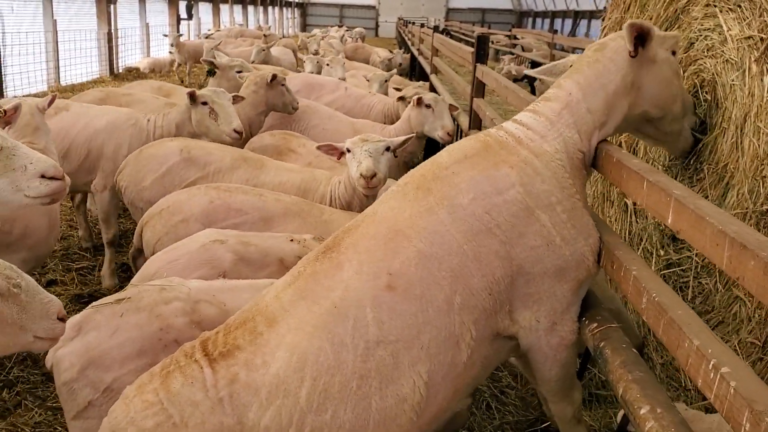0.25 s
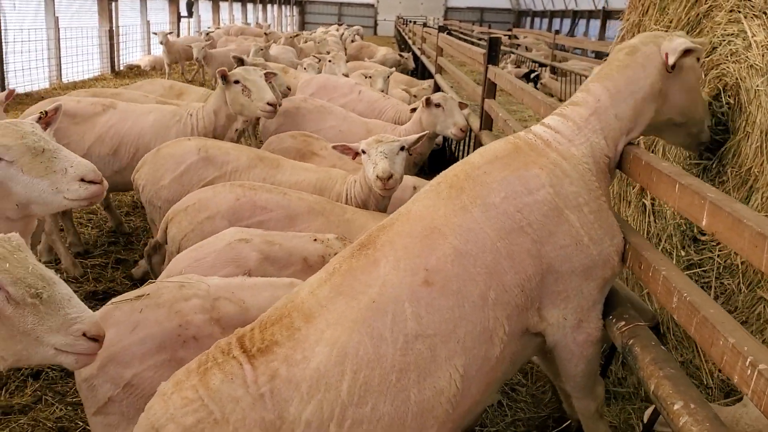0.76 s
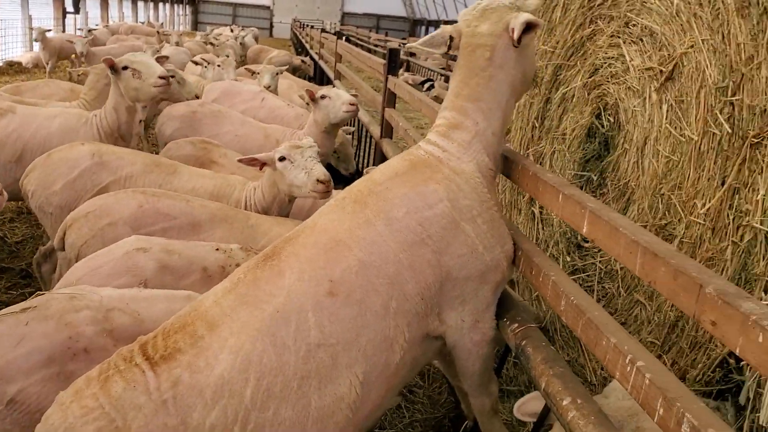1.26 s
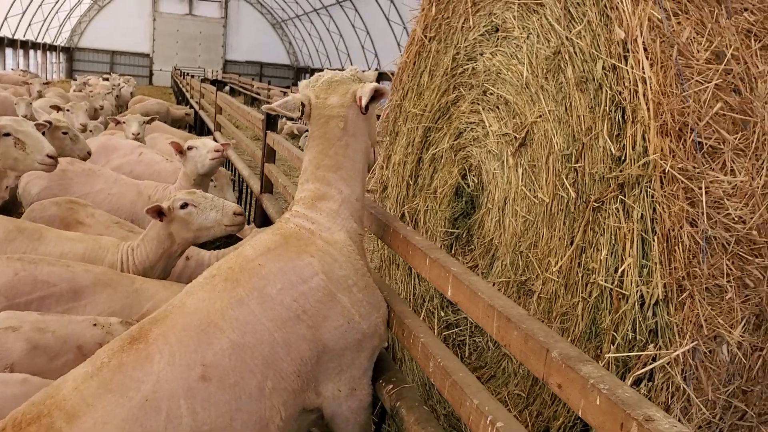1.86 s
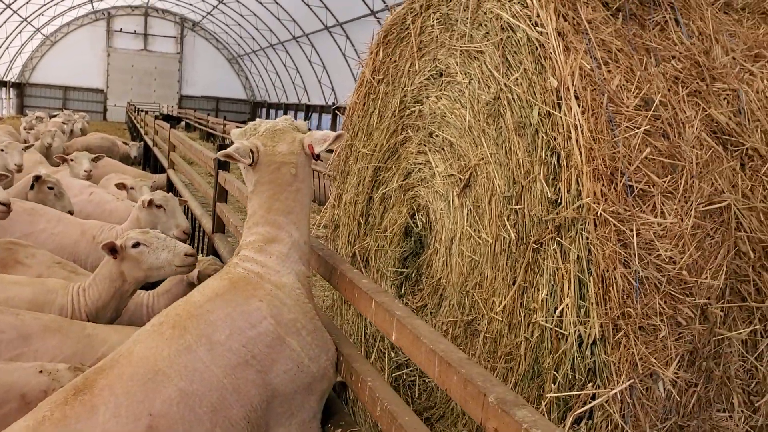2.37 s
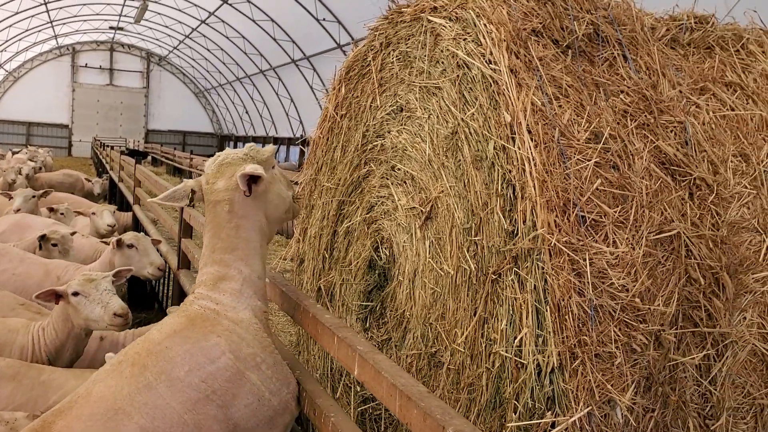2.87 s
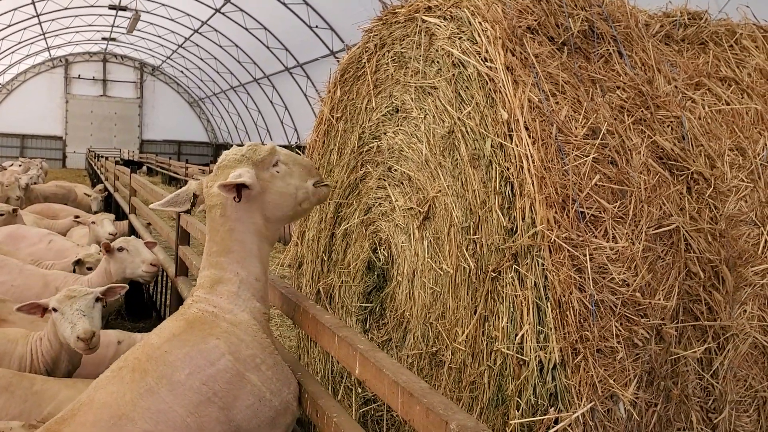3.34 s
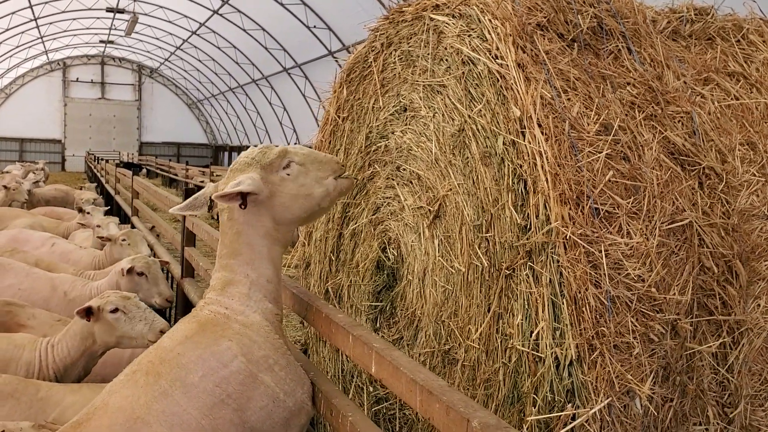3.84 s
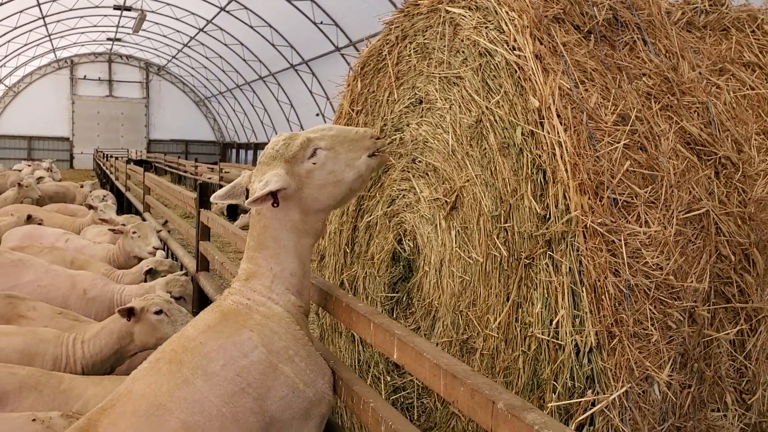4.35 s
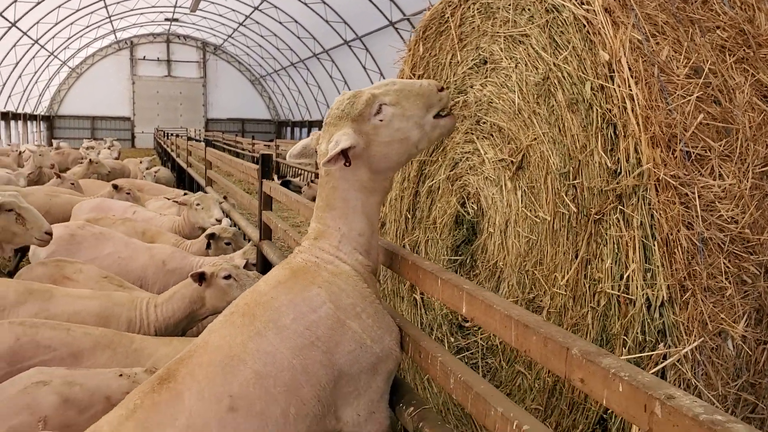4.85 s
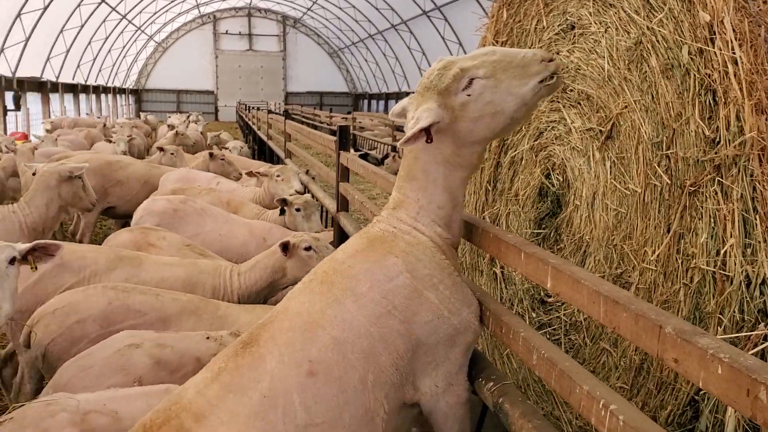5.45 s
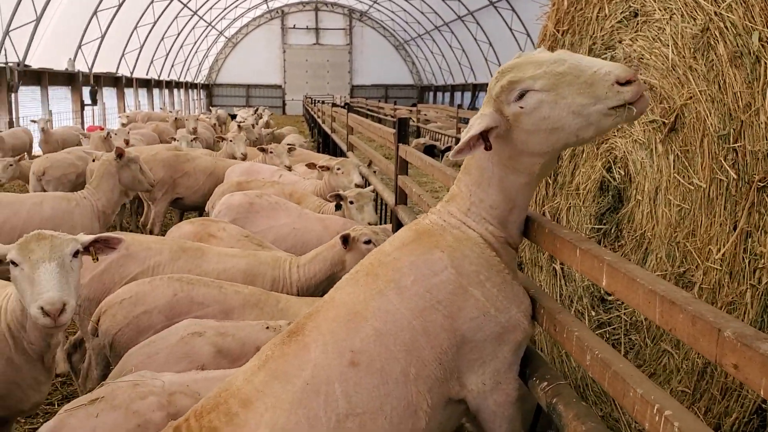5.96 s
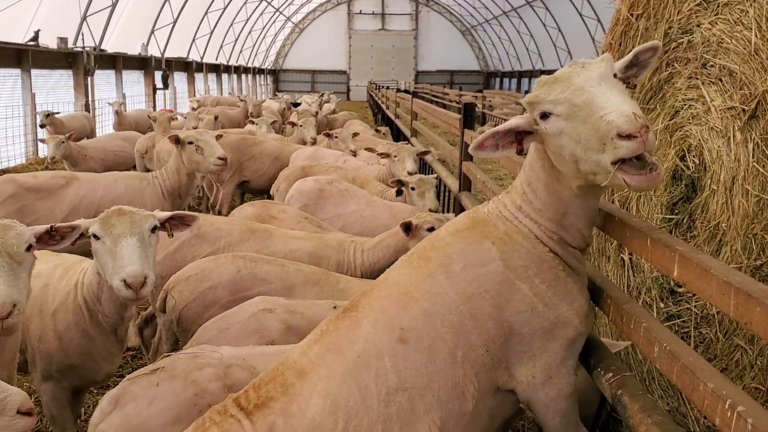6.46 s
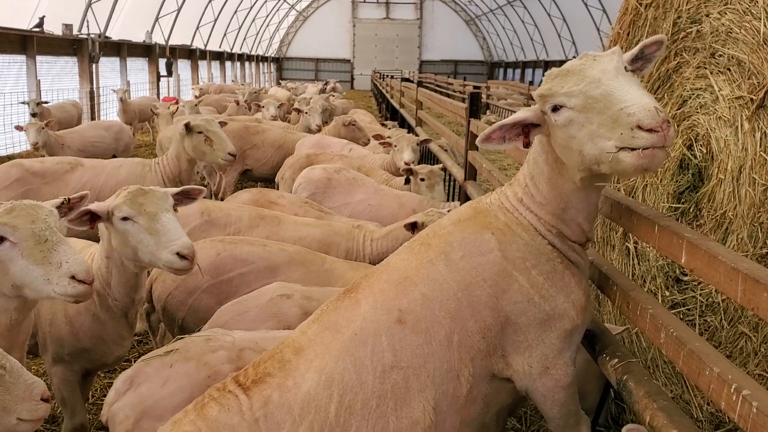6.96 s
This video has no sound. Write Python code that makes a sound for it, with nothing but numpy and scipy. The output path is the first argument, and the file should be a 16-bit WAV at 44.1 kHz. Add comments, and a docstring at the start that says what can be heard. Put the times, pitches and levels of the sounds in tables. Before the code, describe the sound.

A flock shuffles through straw inside a barn for about seven seconds, a soft, crisp rustle over a low rumble of feet, heard in stereo from among the animals. Right at the start, a sheep some way off gives a rough, quavering bleat that throbs seven times and ends around 0.9 seconds. Soft hooves thud, and dry stalks snap at about 1.1 and 1.9 seconds. At 2.3 seconds an animal scuffs briefly close by. At 3.2 seconds a nearer sheep opens with a rasp, glides up to a clear, level note and holds it, dropping away at about 4.3 seconds. Both calls sit slightly left, stand well above the rustle and leave a short echo. Small birds chirp very faintly overhead now and then. Another stalk cracks near 4.9 seconds, and from 5.6 seconds a run of hoof knocks and thuds carries on to the end.

```python
"""Inside an arched sheep barn, on a stereo microphone held among the flock. Straw rustles and hooves thud from
the start. Some way off, a sheep bleats, its larynx throbbing seven times. Stalks snap, a board is knocked,
small birds chirp faintly under the roof, and at 2.3 s an animal scuffs past close by. At 3.2 s a nearer sheep
opens with a rasp, then its vocal folds lock onto a clear held note. Pen boards and roof return both calls, and
the flock shuffles on to the end."""
import sys
import numpy as np
from scipy import signal
from scipy.fft import rfft, irfft, next_fast_len
from scipy.io import wavfile
from scipy.ndimage import uniform_filter1d, map_coordinates

SR = 44100
rng = np.random.default_rng(int(sys.argv[2]) if len(sys.argv) > 2 else 0)


def wav_out(sig):
    """Save sig, one row per channel (or a flat mono array), as 16-bit PCM at SR to the path in sys.argv[1]."""
    wavfile.write(sys.argv[1], SR, np.round(np.clip(np.atleast_2d(sig).T, -1, 1) * 32767).astype(np.int16))


N = 317961
TIME = np.arange(N) / SR

# far sheep, throbs of the larynx: centre_s, level_db, pitch_hz
THROBS = [(0.21, -23, 187.3), (0.304, -20.5, 187.7), (0.403, -20, 182.4), (0.495, -21.5, 180),
          (0.589, -23.5, 182.8), (.685, -25, 175.9), (0.771, -24.5, 181.9)]
# far sheep, mouth closed: frequency_hz, gain_db
HUM_VOWEL = [(71, -34.5), (120, 26), (189, 8.5), (528, -0.5), (1050, -2.5), (1340, -12), (1540, -1.5),
             (2170, -5.5), (2460, 0.5), (2790, -37), (3500, -16), (4550, -54), (7700, -120)]
# mouth half open: frequency_hz, gain_db
MEH_VOWEL = [(110, -57), (180, -7.5), (410, -17.5), (555, 2), (690, -9), (770, -17), (900, -14.5),
             (1250, -16.5), (1560, 0.5), (1750, -12.5), (1950, 5.5), (2200, -13), (2550, -6.5),
             (2850, -21.5), (3700, -21.5), (6500, -45)]
# mouth fully open: frequency_hz, gain_db
BAA_VOWEL = [(110, -38), (180, -11), (410, -17), (535, -2), (670, -9), (770, -13), (900, -15), (1250, -9),
             (1500, -8.5), (1750, -11), (2130, 7.5), (2550, -4), (2900, -20), (3250, -12), (4150, -20),
             (5000, -48)]
# far sheep's balance at the microphone: frequency_hz, left_over_right_db
QUAVER_BALANCE = [(60, 0.5), (110, -1), (200, 0.5), (380, 1), (700, 6), (1290, 9), (2380, 8), (4400, 1),
                  (8120, 4), (15000, -25)]
# its phase at the microphone: frequency_hz, left_lead_rad
QUAVER_PHASE = [(200, 0.4), (800, -0.55), (1200, -2), (2100, -2.5), (2700, -1.4), (6000, -2.5)]

# near sheep, mouth opening: frequency_hz, gain_db
OPENING_VOWEL = [(71, -50), (120, -9), (281, -5), (461, -5), (633, 13.5), (696, 12), (1010, -10), (1240, 2),
                 (1400, 12.5), (1500, 9), (2010, 4.5), (2400, -6.5), (2910, 0), (3200, 9), (4160, -58),
                 (7040, -120)]
# mouth wide: harmonic_number, gain_db
WIDE_VOWEL = [(1, -17), (2, -14), (3, -9.5), (4, 0), (5, -15), (6, -24.5), (7, -4), (8, -1.5), (9, -22),
              (10, -12), (11, -18.5), (12, -30), (13, -27.5), (14, -18.5)]
# mouth settled on the note: harmonic_number, gain_db
SETTLED_VOWEL = [(1, -12.5), (2, -13.5), (3, 3), (4, 5), (5, -6.5), (6, -17.5), (7, 2), (8, 4), (9, -14),
                 (10, -3), (11, -15.5), (12, -28), (13, -14.5), (14, -20)]
# colour of the rasp: frequency_hz, gain_db
RASP_TONE = [(2300, -24), (2900, 9.5), (3500, 0.5), (3950, 6.5), (4450, -3.5), (5300, -0.5), (6600, -12),
             (8000, -7.5), (11000, -26)]
# course of the mouth resonance: time_s, level_db
MOUTH_RESONANCE = [(3.21, -42), (3.252, -28), (3.288, -20), (3.47, -21.5), (3.518, -31.5), (3.536, -25.5),
                   (3.64, -32), (3.798, -24.5), (4.022, -28), (4.074, -36), (4.19, -35), (4.214, -27),
                   (4.3, -43.5)]
# near sheep's balance at the microphone: frequency_hz, left_over_right_db
HELD_BALANCE = [(60, 8), (110, 5), (200, 0), (380, 1), (700, 4), (1290, 9.5), (2380, 7), (4400, -5),
                (8120, 9), (15000, -14)]
# its phase at the microphone: frequency_hz, left_lead_rad
HELD_PHASE = [(150, 0.073), (500, 0.99), (900, 0.46), (1300, 2.3), (1500, 0.25), (1900, 2.57), (3000, 1.6),
              (6000, 1.7)]

# scuffed bedding: frequency_hz, gain_db
SCUFF_TONE = [(53, -13), (90, -3), (177, 1.5), (240, -7), (389, -4.5), (463, -12), (572, -3.5), (655, -15),
              (909, -12), (1240, -17.5), (3000, -18.5), (9000, -29), (11700, -60), (19800, -120)]
# hooves on bedding and boards: start_s, strength_db, pitch_hz
HOOF_STEPS = [(.245, -29.5, 85), (0.716, -34, 75), (1.225, -35, 80.5), (1.276, -43, 185),
              (1.384, -36, 63.4), (1.62, -38.5, 69.6), (2.95, -32, 157), (3.1, -41, 235), (5.652, -36, 309),
              (6.004, -38, 247), (6.115, -31, 393), (6.392, -31.5, 308), (6.469, -29.5, 358),
              (6.871, -28.5, 104), (7.049, -34, 99), (7.175, -32.5, 86)]
# stalks snapping underfoot, and one knock on the boards at 4.89 s: start_s, level_db
SNAPS_AND_KNOCKS = [(1.116, -45.5), (1.896, -41), (4.699, -66), (4.891, -46.5)]
# crack of a stalk or knock on a board: frequency_hz, gain_db
SNAP_TONE = [(300, -10), (900, 0), (3000, -4), (6000, -2), (12000, -12)]
# how busily the flock moves: time_s, bustle_db
BUSTLE = [(0.0, -46), (0.68, -47.5), (1.61, -51), (2.11, -45), (2.59, -48), (2.85, -44), (3.65, -49.5),
          (4.44, -50), (4.9, -51), (5.78, -47), (6.49, -47), (7.21, -44)]
# legs sweeping through straw: centre_s, level_db, half_length_s
LEG_SWISHES = [(0.16, -43.5, 0.044), (0.372, -41.5, .05), (0.841, -41, .025), (1.327, -45, 0.049),
               (1.63, -45.5, 0.067), (2.269, -33, 0.015), (2.82, -42.5, .03), (4.36, -47.5, .05),
               (6.256, -43.5, 0.092), (6.402, -41.5, 0.049), (7.176, -42, .035)]
# crisp straw: frequency_hz, gain_db
STRAW_TONE = [(470, -46), (800, -15), (1050, -7.5), (1590, -8.5), (2010, -6), (2170, -7), (2580, -8.5),
              (3350, -5.5), (4690, -8), (5800, -4.5), (7250, -5.5), (8850, -12), (13200, -2), (15100, 2),
              (15700, -3)]
# dull shuffle of feet: frequency_hz, gain_db
SHUFFLE_TONE = [(110, -14), (175, 5), (290, 7), (500, 0.5), (800, -3), (1400, -21.5)]
# rumble of feet: frequency_hz, gain_db
RUMBLE_TONE = [(20, -40), (32, -16), (50, -1.5), (80, 1), (120, -4.5), (180, -11.5), (300, -32)]
# likeness of the floor noise in left and right: frequency_hz, correlation
FLOCK_LIKENESS = [(60, 0.97), (130, 0.96), (290, 0.95), (640, 0.6), (1410, -0.19), (3100, 0.054),
                  (6820, -0.033), (15000, 0.041)]
# its balance at the microphone: frequency_hz, left_over_right_db
FLOCK_BALANCE = [(60, 0.5), (110, 0.5), (200, 0), (380, 1.5), (700, 4), (1290, 8), (2380, 6), (4400, 1.5),
                 (8120, 5), (15000, 0.5)]
# small birds under the roof: centre_s, level_db, mid_pitch_hz
CHIRPS = [(1.53, -53.5, 3230), (1.689, -53, 3570), (2.45, -50.5, 3350), (3.185, -51, 3450),
          (3.81, -46, 3380), (5.735, -54, 3420), (6.95, -51, 3480)]
# the barn's decay: frequency_hz, t60_s
BARN_DECAY = [(150, 1), (600, 0.66), (2000, 0.76), (4000, 0.95), (10000, 0.4)]
# colour of its tail: frequency_hz, gain_db
BARN_TONE = [(200, -7), (700, 10.5), (1800, 5.5), (6000, 11.5)]


def quavering_bleat():
    """Far sheep: the mouth opens from a hum; each larynx throb lifts pitch, loudness and fullness."""
    scoop = bump(.165, .078)  # the pitch scoops up as the mouth opens
    pitch_hz = 158.35 + 35.02 * scoop
    rest_level = amp(-45.5 + 9 * ramp(0, .098) + 3.3 * scoop - 174 * since(.776))
    level, drive, throb_half_s = rest_level, np.zeros(N), .018
    for centre_s, level_db, throb_hz in THROBS:
        push = bump(centre_s, 1.7 * throb_half_s)
        pitch_hz = pitch_hz + (throb_hz - pitch_hz) * push
        level = level + np.maximum(amp(level_db) - rest_level, 0) * bump(centre_s, throb_half_s)
        drive = drive + push
    opened, gape = ramp(.12, .21), .62 * bump(.5, .23)
    rough = .23 + .22 * opened + .13 * ramp(.29, .63)  # the voice frays as the call goes on
    pulses = vocal_folds(pitch_hz, rough, jitter_s=.0002, shimmer_db=1.8, air=1.65)
    vowel = (1 - gape) * throat(pulses, MEH_VOWEL) + gape * throat(pulses, BAA_VOWEL)
    # between throbs the voice thins to its main mouth resonance
    core = filtered(vowel, lambda hz: np.exp(-((hz - 2000) / 700) ** 2))
    vowel = core + (vowel - core) * (.62 + .55 * drive)
    voice = steady((1 - opened) * throat(pulses, HUM_VOWEL) + opened * vowel)
    return at_microphone(voice * level, QUAVER_BALANCE, QUAVER_PHASE)


def held_bleat():
    """Near sheep: a rasp glides up through two vowels, then the folds lock into a clean, level note."""
    start_s, attack_s, rasp_s, lock_s, release_s = 3.222, .055, 3.35, .1, 4.22
    full_s = start_s + attack_s
    slack = ramp(release_s - .025, release_s + .08) ** 2  # the folds let go ever faster
    rough = .015 + .17 * np.exp(-since(rasp_s) / lock_s) + .65 * slack ** .8
    pulses = vocal_folds(held_pitch(slack), rough, jitter_s=.00022, shimmer_db=4, air=1.7)
    wide = throat(pulses, [(harmonic * 185, db) for harmonic, db in WIDE_VOWEL])
    settled = throat(pulses, [(harmonic * 183, db) for harmonic, db in SETTLED_VOWEL])
    widen, settle = ramp(3.3, 3.37), ramp(3.55, 3.91)
    voice = (1 - widen) * throat(pulses, OPENING_VOWEL) + (widen - settle) * wide + settle * settled
    below = lambda edge_hz, order: filtered(voice, lambda hz: 1 / (1 + (hz / edge_hz) ** order))
    low, low_and_mid, whole = below(1010, order=12), below(1690, order=24), below(2630, order=24)

    release_db_per_s = 143
    gate_db = -26 * until(full_s) / attack_s - release_db_per_s * since(release_s)
    throat_db = -22.5 + gate_db - 7.5 * since(full_s)  # breath slowly runs out
    mouth_db = curve(MOUTH_RESONANCE) - .3 - release_db_per_s * since(MOUTH_RESONANCE[-1][0])
    # the upper resonances flare in the attack, then stay as a steady twang
    twang = amp(.66 * gate_db) * np.hypot(amp(-27.5 - 66 * since(rasp_s)), amp(-39.5))
    rasp = amp(-34.5 - 155 * until(rasp_s) - 118 * since(rasp_s))
    buzz = settle * amp(throat_db - 23)
    call = (amp(throat_db) * steady(low)
            + amp(mouth_db) * steady(low_and_mid - low)
            + twang * steady(whole - low_and_mid)
            + (rasp + buzz) * throat(pulses, RASP_TONE))
    voiced = ramp(start_s, start_s + .01) - ramp(release_s + .085, release_s + .116)
    return at_microphone((call + rail_echo(call)) * voiced, HELD_BALANCE, HELD_PHASE)


def held_pitch(slack):
    """The folds tighten past the note, ease back onto it and slacken at the end."""
    from_hz, note_hz, overshoot_hz, drop_hz = 145.5, 182.7, 4.2, 36.1
    top_hz = note_hz + overshoot_hz * np.exp(-since(3.44) / .12)
    glide = np.sin(np.pi / 2 * ramp(3.24, 3.44))
    return (from_hz + (top_hz - from_hz) * glide - drop_hz * slack) * (1 + .0008 * wobble(25))


def vocal_folds(pitch_hz, rough, jitter_s, shimmer_db, air):
    """One pulse per cycle; roughness scales the scatter in time and level and each puff of air."""
    cycles = np.cumsum(pitch_hz) / SR
    closures = np.interp(np.arange(1, int(cycles[-1])), cycles, np.arange(N))
    puffs = rng.standard_normal(N) * np.exp(-3.5 * (cycles % 1))
    puffs = filtered(puffs, lambda hz: hz ** 2 / (hz ** 2 + 700 ** 2))  # turbulence spares the bass
    scatter = rng.standard_normal((len(closures), 2)) * rough[closures.astype(int), None]
    closures = closures + jitter_s * SR * scatter[:, 0]
    # a windowed sinc places each pulse between samples
    taps = closures.astype(int)[:, None] + np.arange(-7, 9)
    offset = taps - closures[:, None]
    shapes = np.sinc(offset) * np.cos(np.pi * offset / 16) ** 2 * amp(shimmer_db * scatter[:, 1:])
    pulses = np.bincount(np.clip(taps, 0, N - 1).ravel(), shapes.ravel(), N)
    return unit(pulses) + air * rough * unit(puffs)


def throat(pulses, vowel, size=4096):
    """Throat and mouth ring on after each pulse strikes; the level is held steady."""
    hz = np.fft.rfftfreq(size, 1 / SR)
    gain = amp(along(vowel, hz)) * hz ** 2 / (hz ** 2 + 90 ** 2)
    cepstrum = irfft(np.log(np.maximum(gain, 1e-4)))
    cepstrum[1:size // 2] *= 2  # folded to minimum phase
    cepstrum[size // 2 + 1:] = 0
    lag_s_per_hz = 5e-7  # the folds do not close all at once, so higher partials come later
    ring = irfft(np.exp(rfft(cepstrum) - 1j * np.pi * lag_s_per_hz * hz ** 2))
    return steady(signal.fftconvolve(pulses, ring)[:N])


def at_microphone(voice, balance, phase):
    """A voice reaches the microphone's two ports with different strength and phase."""
    def response(hz):
        left = amp(along(balance, hz) / 2) * np.exp(.5j * along(phase, hz))
        return np.array([left, 1 / left]) * 2 / np.abs(left + 1 / left)
    return filtered(voice, response)


def scuff(peak_s=2.281, hold_s=.045):
    """One animal brushes through the bedding, close to the microphone."""
    level_db = -32.5 - 172 * until(peak_s) - 168 * since(peak_s + hold_s)
    return amp(level_db) * rustle(SCUFF_TONE, patchy_db=2.5, grain_db=1.5)


def hooves():
    """Each step is a soft, quickly damped thud with a short crunch of straw."""
    thuds, crunch = np.zeros(N), np.zeros(N)
    for start_s, strength_db, pitch_hz in HOOF_STEPS:
        age_s = since(start_s)
        t60_s = .04 + 6 / pitch_hz  # deep thuds last longer
        blow = amp(strength_db - 60 * age_s / t60_s) * (1 - np.exp(-age_s / .0055))
        thuds += blow * np.sin(2 * np.pi * pitch_hz * age_s + 1.05 * wobble(170))
        crunch += blow
    return amp(2.5) * thuds + amp(-12.5) * crunch * rustle(SCUFF_TONE, patchy_db=-1, grain_db=3.5)


def snaps_and_knocks(t60_s=.15):
    """Dry stalks break, and a board is knocked once, each with a brief, broad crack."""
    bursts = sum(amp(db - 60 * since(s) / t60_s) * (TIME >= s) for s, db in SNAPS_AND_KNOCKS)
    return bursts * rustle(SNAP_TONE, patchy_db=3, grain_db=2)


def flock():
    """Feet in deep straw all round: a crisp rustle, a dull shuffle and a rumble grow with the bustle."""
    bustle_db = curve(BUSTLE)
    bustle_db -= bustle_db.mean()
    level = lambda db, growth, swing_db: amp(db + growth * bustle_db + swing_db * wobble(9))
    swishes = sum(amp(db) * bump(s, half_s) for s, db, half_s in LEG_SWISHES)
    straw_level = np.hypot(level(-44.5, growth=1.11, swing_db=1.15), swishes)
    straw = straw_level * rustle(STRAW_TONE, patchy_db=1.5, grain_db=1)
    shuffle = level(-53.5, growth=1.2, swing_db=1.2) * rustle(SHUFFLE_TONE, patchy_db=2.5, grain_db=1.5)
    rumble = level(-51, growth=1.9, swing_db=1.3) * rustle(RUMBLE_TONE, patchy_db=1.5, grain_db=1.5)
    return straw + shuffle + rumble


def rustle(tone, patchy_db, grain_db):
    """Trodden bedding: grainy stereo noise, its gain patchy in time and frequency, at mono rms 1."""
    grains = rng.standard_normal((2, N)) * amp(grain_db * wobble(350))
    spectra = signal.stft(grains, nperseg=512)[2]
    patches = uniform_filter1d(rng.standard_normal(spectra.shape[1:]), size=7, axis=0)
    patches = unit(uniform_filter1d(patches, size=10, axis=1))
    pair = signal.istft(spectra * amp(patchy_db * patches), nperseg=512)[1][:, :N]
    width = lambda hz: np.tan(np.arccos(np.clip(along(FLOCK_LIKENESS, hz), -.9, 1)) / 2)
    mid, side = filtered(pair, lambda hz: amp(along(tone, hz)) * [np.ones_like(hz), width(hz)])
    balance = lambda hz: amp(np.outer([.5, -.5], along(FLOCK_BALANCE, hz)))
    stereo = filtered(np.array([mid + side, mid - side]), balance)
    return stereo / np.std(stereo.mean(axis=0))


def birds():
    """Short, husky chirps from under the roof arch up and down in pitch."""
    song = np.zeros(N)
    for centre_s, level_db, mid_hz in CHIRPS:
        arch = bump(centre_s, .022)
        pitch_hz = mid_hz * (.92 + .16 * arch + .025 * wobble(400))
        song += amp(level_db) * arch * np.sin(2 * np.pi * np.cumsum(pitch_hz) / SR)
    return np.array([song, song])


def rail_echo(call):
    """As the head turns, a reflection off the rail slides in delay, so overtones swell and fade."""
    delay_s = .0026 + .00006 * wobble(3)
    return amp(-17) * map_coordinates(call, [np.arange(N) - delay_s * SR])


def pen_boards(sound, count=12):
    """Boards close by return a scatter of bright early copies, different at each port."""
    echoes = np.zeros((2, SR // 20))
    for port in echoes:
        port[rng.integers(SR // 700, SR // 50, count)] = rng.choice([-1, 1], count) / np.sqrt(count)
    early = signal.fftconvolve(sound, echoes, axes=1)[:, :N]
    return filtered(early, lambda hz: hz ** 4 / (hz ** 4 + 700 ** 4))


def barn_roof(sound, delay_s=.009):
    """The arched roof answers with a diffuse tail, longest in the bass."""
    hz, age_s, spectra = signal.stft(rng.standard_normal((2, SR)), SR, nperseg=256)
    decay = amp(-60 * age_s / along(BARN_DECAY, hz)[:, None])
    tail = signal.istft(spectra * decay, SR, nperseg=256)[1]
    tail = np.pad(tail, ((0, 0), (round(delay_s * SR), 0))) / np.sqrt(SR * .07)
    wet = signal.fftconvolve(sound, tail, axes=1)[:, :N]
    return filtered(wet, lambda hz: amp(along(BARN_TONE, hz)))


def amp(db):
    """Decibels to gain."""
    return 10 ** (np.asarray(db) / 20)


def unit(x):
    """Scale to rms 1."""
    return x / np.sqrt(np.mean(x ** 2) + 1e-20)


def steady(x):
    """Hold the running rms at 1."""
    power = uniform_filter1d(uniform_filter1d(x * x, size=900), size=900)
    return x / np.sqrt(np.abs(power) + 1e-12)


def along(points, hz):
    """Read (frequency_hz, value) points on a log axis."""
    knots_hz, values = np.transpose(points)
    return np.interp(np.log(hz + 1), np.log(knots_hz + 1), values)


def curve(points):
    """Read (time_s, value) points at every sample."""
    return np.interp(TIME, *np.transpose(points))


def ramp(start_s, end_s):
    """Rise from 0 to 1 between two times."""
    return np.clip((TIME - start_s) / max(end_s - start_s, 1e-3), 0, 1)


def since(s):
    """Seconds gone by after a time, 0 before it."""
    return np.maximum(TIME - s, 0)


def until(s):
    """Seconds left before a time, 0 after it."""
    return np.maximum(s - TIME, 0)


def bump(centre_s, half_s):
    """A bell-shaped swell of height 1."""
    return np.exp(-((TIME - centre_s) / half_s) ** 2)


def wobble(rate):
    """A smooth random curve, rate knots a second."""
    return map_coordinates(rng.standard_normal(int(N * rate / SR) + 4), [TIME * rate])


def filtered(x, response):
    """Shape x by a response of frequency."""
    size = next_fast_len(N + SR // 2)
    return irfft(rfft(x, size) * response(np.fft.rfftfreq(size, 1 / SR)), size)[..., :N]


def scene():
    """From among the flock: the quavering sheep stands farther off, so more barn is heard with it."""
    far, near, chirps = quavering_bleat(), held_bleat(), birds()
    # the roof's echo shifts colour during the far call, so no fixed bands ring
    tail_blend = np.pi / 2 * ramp(.2, 1)
    far_send = amp(-12.5) * far
    tail = barn_roof(far_send * np.cos(tail_blend) + amp(-15) * near + amp(-12) * chirps)
    tail += barn_roof(far_send * np.sin(tail_blend))
    # early echoes blur the rasping attack, then drop out, leaving the held note clear
    attack_echo = 1 - ramp(3.53, 3.6)
    early = pen_boards(amp(-8.5) * far + amp(-11) * attack_echo * near)
    return far + near + chirps + early + tail + flock() + scuff() + hooves() + snaps_and_knocks()


def record(dry, top_hz=15750):
    """The recorder keeps nothing above its band limit."""
    return filtered(dry, lambda hz: hz < top_hz)


dry = scene()
out = record(dry)
wav_out(out)
```